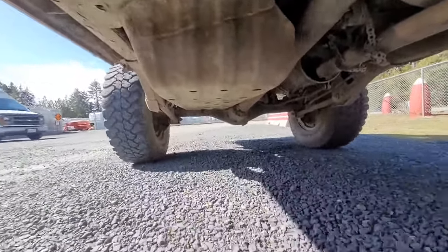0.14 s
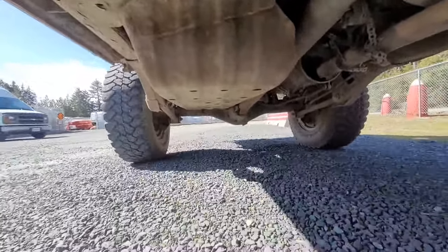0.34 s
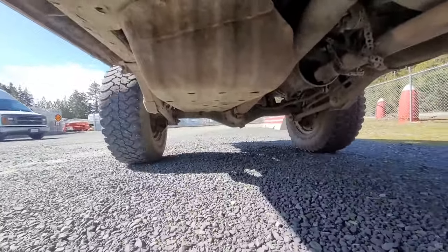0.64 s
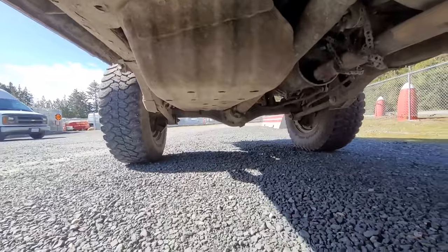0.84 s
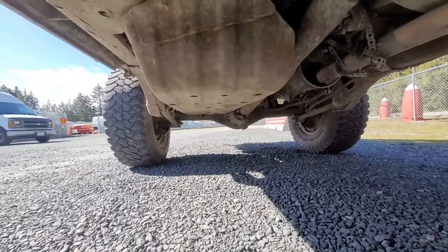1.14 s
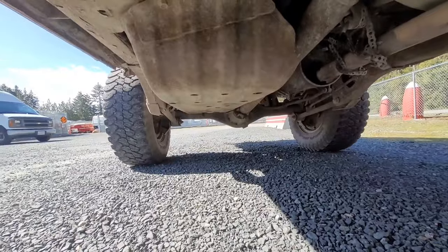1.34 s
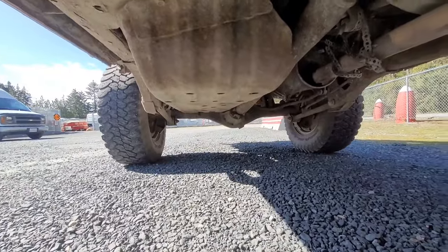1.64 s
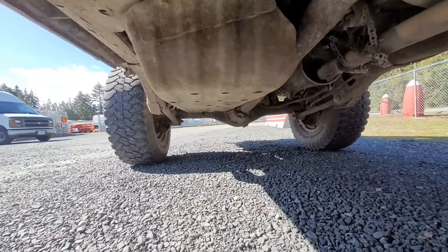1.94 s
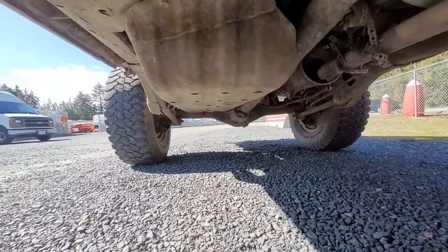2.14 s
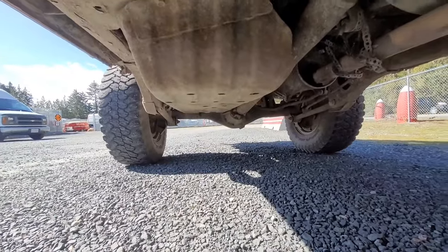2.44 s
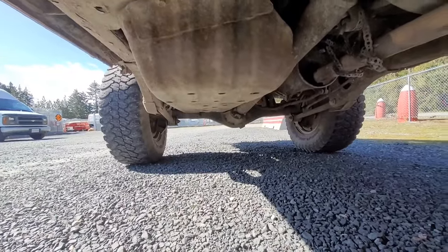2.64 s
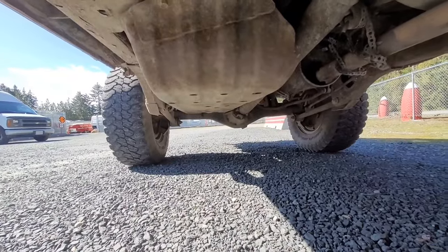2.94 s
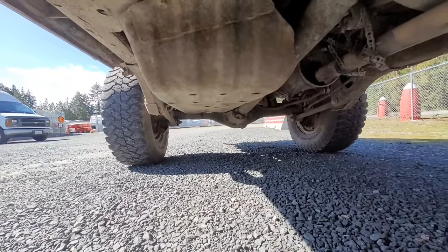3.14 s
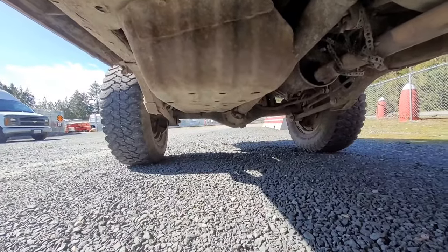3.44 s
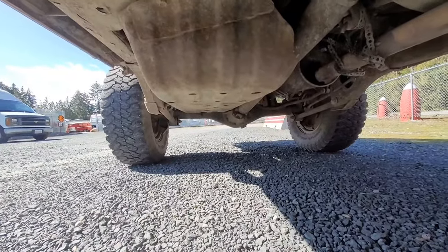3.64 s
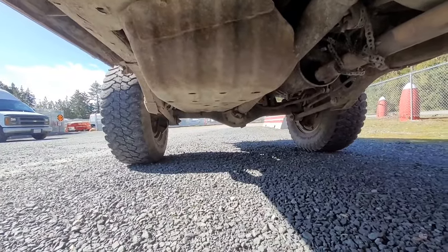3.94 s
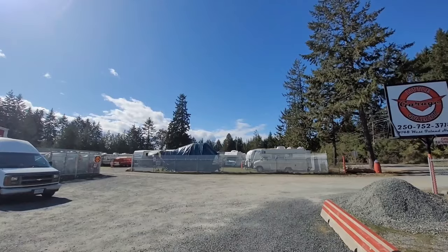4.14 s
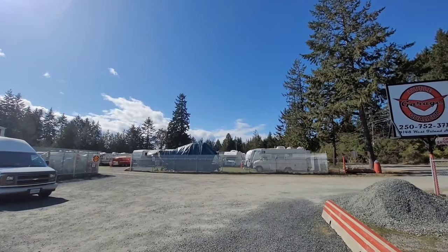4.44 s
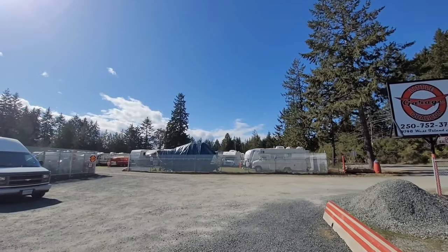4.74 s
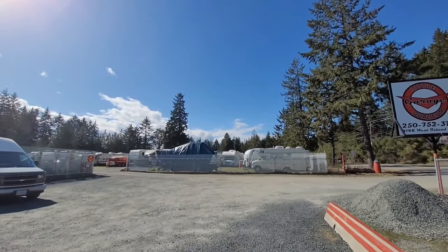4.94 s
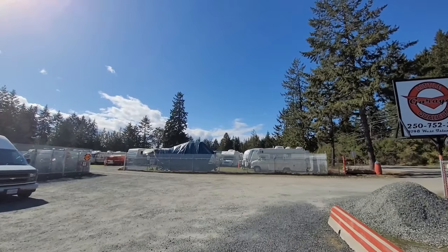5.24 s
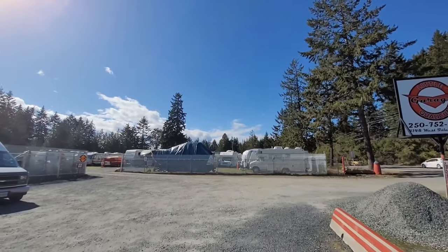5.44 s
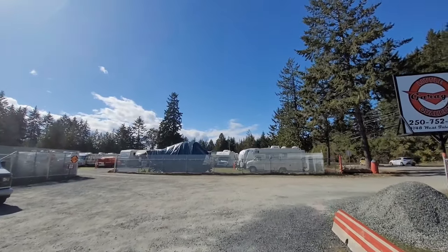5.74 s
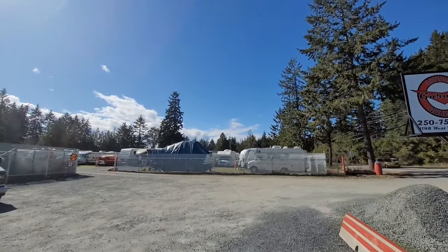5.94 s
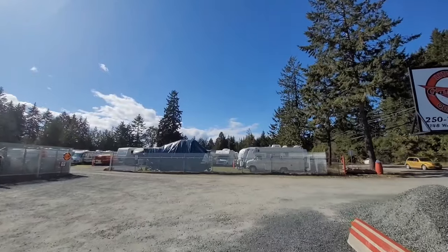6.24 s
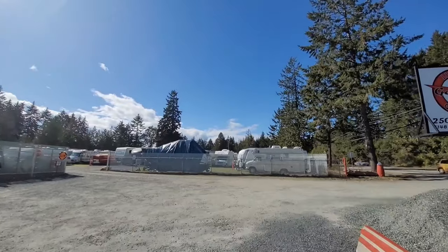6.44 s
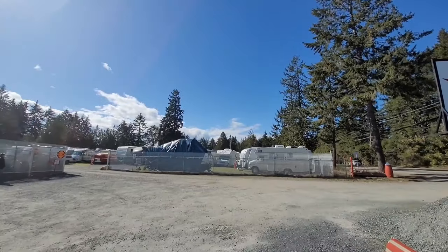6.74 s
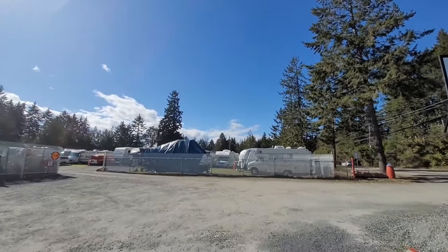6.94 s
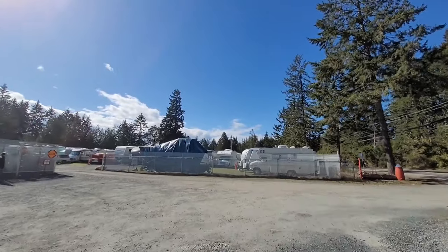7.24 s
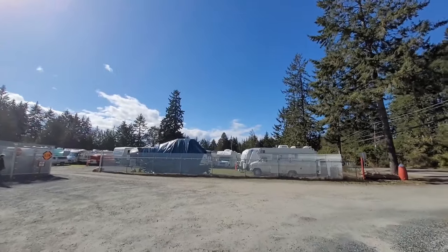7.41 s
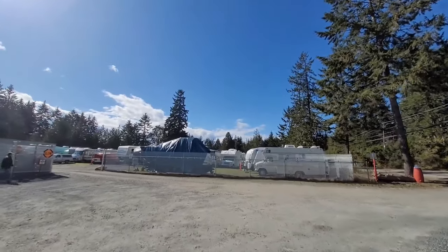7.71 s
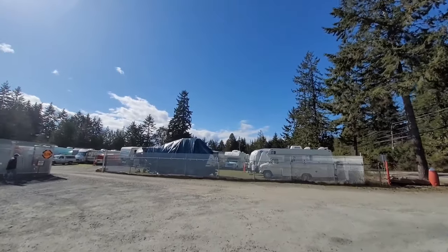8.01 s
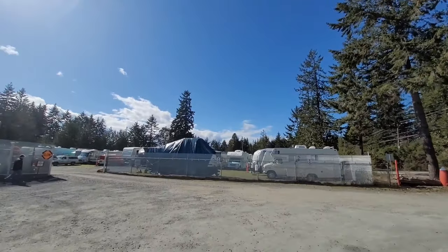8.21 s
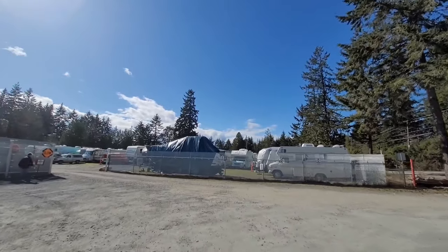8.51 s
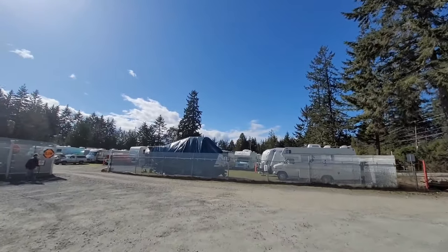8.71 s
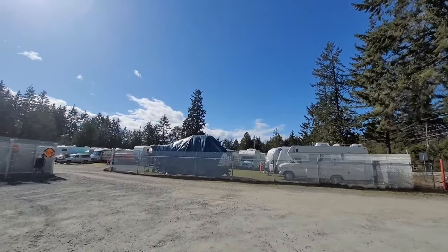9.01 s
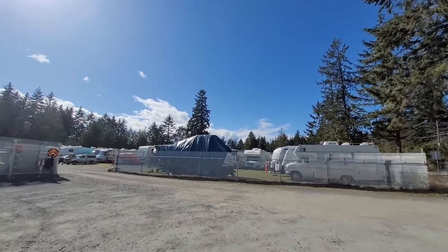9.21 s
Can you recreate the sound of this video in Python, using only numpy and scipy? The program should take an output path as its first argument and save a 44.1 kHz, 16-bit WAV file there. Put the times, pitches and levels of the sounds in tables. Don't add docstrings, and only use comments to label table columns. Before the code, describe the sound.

Two microphones close beneath a vehicle in an open gravel yard catch low exhaust throb, tyre roar and stony hiss. Metal clatters early, then chuffs slow to a near stop. A restrained pulling engine follows, with a scraping stone and gravel spray. After a tiny silent join, higher revs sink gradually while stones hit the pan, sand hisses and a car whooshes by; a slow idle remains.

```python
import sys
import numpy as np
from scipy import signal
from scipy.fft import rfft, irfft, next_fast_len
from scipy.io import wavfile
from scipy.ndimage import uniform_filter1d, map_coordinates

SR = 44100
rng = np.random.default_rng(int(sys.argv[2]) if len(sys.argv) > 2 else 0)


def store_wav(level_fs):
    pcm = np.round(np.clip(np.atleast_2d(level_fs), -1, 1) * 32767)
    wavfile.write(sys.argv[1], SR, pcm.T.astype(np.int16))


def how_loud(loudness_db):
    steps = np.asarray(loudness_db, float) / 20
    return 10 ** steps


N = 413199
T = np.arange(N) / SR

# time in seconds, firing rate in Hz, effort in dB.
ENGINE = [
    [(0, 29.8, -14.5), (.7, 30.0, -14.5), (1.0, 29.75, -16), (1.292, 29.5, -17.5), (1.42, 27.5, -19),
     (1.95, 27.84, -28)],
    [(1.97, 37.5, -25), (2.15, 38.27, -26.5), (2.45, 37.3, -27), (2.75, 36.78, -21.5), (3.42, 35.78, -23.5),
     (4.05, 33.98, -22.5)],
    [(4.08, 55.74, -21), (4.35, 58.6, -23), (4.5, 56.2, -24), (4.62, 53.8, -28), (5.22, 43.4, -28),
     (5.52, 38.42, -28), (6.01, 35.95, -24), (6.51, 35.7, -25.5), (7.3, 38.67, -27), (7.67, 37.73, -31.5),
     (7.75, 34.2, -23), (7.98, 30.5, -29), (8.38, 31.2, -29), (8.65, 29.0, -27), (8.9, 29.6, -26),
     (9.11, 27.9, -26), (9.37, 27.4, -25)],
]
CUTS_S = (1.96, 4.062)


def unit(x):
    return x / np.sqrt(np.mean(x ** 2) + 1e-20)


def along(points, hz):
    f, v = np.transpose(points)
    return np.interp(np.log(hz + 1), np.log(f + 1), v)


def curves(rows, t=T):
    s, *cols = np.transpose(rows)
    return [np.interp(t, s, c) for c in cols]


def held(rows, t=T):
    s, *cols = np.transpose(rows)
    return [c[np.searchsorted(s[1:], t)] for c in cols]


def by_stretch(rows):
    return np.transpose(rows)[:, np.searchsorted(CUTS_S, T)]


def waver():
    return 1.2 * map_coordinates(rng.standard_normal(60), [T * 5])


def resonate(x, modes):
    evenness = 0.53
    m = next_fast_len(N + SR // 2)
    f = np.fft.rfftfreq(m, 1 / SR)
    h = 0
    for centre, width, db in modes:
        near = (f * width) ** 2
        h = h + how_loud(db) * (near / ((centre * centre - f * f) ** 2 + near)) ** 1.375
    echoes = 2.4 * np.sin(2 * np.pi * f * .0072) * np.clip(f / 60 - 2.2, 0, 1)
    slip = -np.exp(-1j * (1.465 * np.log(f + 1) - 7.1 + echoes))
    y = irfft(rfft(x, m) * h * slip, m)[:N]
    y /= np.sqrt(np.mean(h ** 2))
    power = np.abs(uniform_filter1d(uniform_filter1d(y * y, size=4000), size=4000)) + 1e-12
    return y / power ** (evenness / 2)


def resonate_by_stretch(x, sets):
    which = np.searchsorted(CUTS_S[1 - len(sets):], T)
    return np.choose(which, [resonate(x, modes) for modes in sets])


def rush(spectrum, patchy_db, grit_db):
    grains = how_loud(grit_db * unit(uniform_filter1d(rng.standard_normal(N), size=90)))
    hz, t, z = signal.stft(grains * rng.standard_normal((3, N)), SR, nperseg=512)
    patches = uniform_filter1d(rng.standard_normal(z.shape[1:]), size=9, axis=0)
    patches = uniform_filter1d(patches, size=9, axis=1)
    z *= how_loud(patchy_db * unit(patches) + along(spectrum, hz)[:, None])
    return unit(signal.istft(z, nperseg=512)[1][:, :N])


def spread(x, share, loose=None):
    # start in seconds, samples left is late below the split,
    # samples left is late above it, share common to both microphones (0-1).
    lateness = [(0, 7, 7.5, .2), (.45, 6.5, 7.5, .36), (1.25, 7, 8, .55), (1.96, 15.5, 19, .3),
                (2.55, 17.5, 19.5, .45), (2.85, 19, 20, .55), (3.3, 20, 21, .75), (3.92, 18, 18.5, .75),
                (4.06, 21.5, 21.5, .6), (4.6, 22.5, 22, .6), (4.95, 13.5, 20, .5), (5.5, 14, 14, .55),
                (5.95, 16, 16.5, .7), (6.4, 18, 18, .6), (6.6, 21.5, 19.5, .75), (6.9, 23, 21.5, .9),
                (7.4, 22, 22, .75), (7.75, 18, 22, .6), (8.1, 13.5, 21, .6), (8.85, 13, 13, .65)]
    # pitch in Hz, factor on the common share.
    alikeness = [(250, 1.05), (1000, .9), (2500, .85), (4500, .95), (8000, .85), (14000, .7)]
    split_hz = 3600
    hz, t, z = signal.stft(x, SR, nperseg=512)
    under, over, common = uniform_filter1d(held(lateness, t), size=40)
    lag = np.where(hz[:, None] < split_hz, under, over)
    ramp = np.exp(1j * np.pi * share * hz[:, None] * lag / SR)
    pair = np.array([z / ramp, z * ramp])
    if loose is not None:
        alike = np.clip(along(alikeness, hz)[:, None] * common, 0, .97)
        own = signal.stft(loose, nperseg=512)[2]
        pair = np.sqrt(alike) * pair + np.sqrt(1 - alike) * own
    return signal.istft(pair, nperseg=512)[1][:, :N]


def underbody(x):
    t = np.arange(SR // 6) / SR
    tail = rng.standard_normal((2, len(t))) * how_loud(-60 * t / .07) * (t > .002)
    return signal.fftconvolve(x[None], tail / np.linalg.norm(tail[0]), axes=1)[:, :N]


def buffeting():
    # pitch in Hz, strength in dB per Hz.
    air = [(18, -36), (36, -6), (55, 11.5), (90, -16.5), (200, -25), (500, -62), (1500, -120)]
    return how_loud(-46) * rush(air, 2.5, 1.5)[:2]


def passing_car():
    # pitch in Hz, width in Hz, level in dB.
    far_modes = [(1500, 420, -1.5)]
    near_modes = [(1840, 580, -5), (3980, 420, -31)]
    nearest_s, comes_s, goes_s, level_db = 7.13, 0.15, 0.28, -36.5
    age = T - nearest_s
    swell = 1 / (1 + (age / np.where(age < 0, comes_s, goes_s)) ** 2) ** 0.95
    far = resonate(rng.standard_normal(N), far_modes)
    near = resonate(rng.standard_normal(N), near_modes)
    share = 1 / (1 + np.exp(-(age + 0.051) / 0.06))
    return how_loud(level_db) * swell * (np.sqrt(1 - share) * far + np.sqrt(share) * near)


def sand_scuff():
    # time in seconds, level in dB.
    swell = [(5.4, -68), (5.75, -50), (6.25, -46.5), (6.6, -52), (6.9, -68)]
    # pitch in Hz, width in Hz, level in dB.
    modes = [(2900, 800, 2), (5200, 700, -13)]
    level_db = curves([(5.3, -120)] + swell + [(7, -120)])[0]
    return how_loud(level_db) * resonate(rng.standard_normal(N), modes)


def stone_drag():
    # time in seconds, level in dB.
    scrape = [(2.95, -62), (3.12, -38), (3.27, -35), (3.45, -34), (3.65, -43.5), (4.05, -51)]
    # pitch in Hz, width in Hz, level in dB.
    modes = [(760, 270, 10.5), (1080, 200, -10)]
    lumps_db = 3.5 * map_coordinates(rng.standard_normal(400), [T * 35])
    level_db = curves([(2.9, -92)] + scrape + [(4.06, -89)])[0]
    return how_loud(level_db + lumps_db) * resonate(rng.standard_normal(N), modes)


def tyres():
    # time in seconds, rolling in dB, crunching stones in dB.
    rolling = [
        [(0, -33, -39.5), (1, -36.5, -42.5), (1.22, -36, -39.5), (1.41, -39, -41.5), (1.54, -42, -52),
         (1.95, -49.5, -59)],
        [(1.97, -46, -61), (2.3, -45.5, -58.5), (2.95, -38, -47.5), (3.06, -39.5, -41.5), (3.3, -36, -45),
         (3.33, -42, -48.5), (3.385, -40.5, -50), (3.41, -35.5, -43), (3.72, -43, -41.5), (3.8, -41, -44.5),
         (4.05, -41.5, -49.5)],
        [(4.08, -35.5, -53.5), (4.8, -36.5, -62.5), (5.6, -35.5, -64), (5.9, -33.5, -60), (6.32, -31, -50),
         (6.5, -33, -54), (6.8, -29.5, -48.5), (7.14, -31.5, -49), (7.6, -32, -53), (8.1, -31.5, -54.5),
         (8.5, -32.5, -54.5), (8.9, -30.5, -58.5), (9.37, -33, -55.5)],
    ]
    # rumble in dB over rolling, roar in dB over rolling, hiss shift in dB,
    # swish in dB over rolling.
    tread = [
        (4, -3.5, -0.7, -31.5),
        (1.5, -6, -1.5, -24),
        (0, -5, -2, -29.5),
    ]
    # pitch in Hz, strength in dB per Hz.
    rumble = [(150, -36), (250, 9), (356, 1.5), (399, 3.5), (792, 1), (908, 0.5), (1080, -6.5), (1400, -9),
              (1820, -42.5), (3080, -120)]
    roar = [(600, -47), (900, -7.5), (1200, -1.5), (1500, -2), (1850, -4), (2200, -7.5), (2700, -12),
            (3300, -23), (4000, -19.5), (6000, -59.5), (9000, -120)]
    crunch = [(1650, -26), (2800, -5), (3520, -8), (4660, -9.5), (5130, -13.5), (5600, -12.5), (6090, -16),
              (7230, -17.5), (8000, -18), (10400, -22.5), (17600, -120)]
    hiss = [(3820, -32.5), (6500, -17), (7220, -11.5), (7980, 3), (9130, -2), (12100, 6), (15300, -3),
            (15850, -4)]
    swish = [(2900, -30.5), (3500, -5.5), (4000, -6), (4600, -1), (5200, -10.5), (5900, -9), (6800, -33)]
    # time in seconds, tick in dB (not used), share of noise cut once a firing (0-1).
    chopping = [(0, -70, .2), (1.2, -70, .22), (1.3, -70, .1), (4.05, -70, .1), (4.1, -70, .2)]
    rolling_db, crunch_db = curves(np.vstack(rolling))
    rumble_db, roar_db, hiss_db, swish_db = by_stretch(tread)
    rumble_db = rumble_db + rolling_db
    roar_db = roar_db + rolling_db
    hiss_db = hiss_db - 47.5 + 1.22 * (crunch_db + 40.5)
    turns = np.cumsum(curves(np.vstack(ENGINE))[0]) / SR
    chop = 1 + np.clip(curves(chopping)[1], 0, 1) * np.cos(2 * np.pi * (turns + 0.18))
    surge_db = map_coordinates(rng.standard_normal(200), [T * 14])
    low = how_loud(rumble_db - 1.0) * rush(rumble, 0.95, 0.75)
    low += how_loud(roar_db + 0.38 * surge_db) * rush(roar, 0.48, 0.23)
    high = how_loud(crunch_db) * rush(crunch, 2.1, 0.81)
    high += how_loud(hiss_db) * rush(hiss, 0.58, 2.0)
    high += how_loud(swish_db + rolling_db + 1.5 * waver()) * rush(swish, 1.2, 1.2)
    return chop * (low + how_loud(.8 * surge_db) * high)


def chuffs():
    start_s, start_hz, slows_hz_per_s = 1.2845, 28.54, 34.9
    speed = np.sqrt(start_hz ** 2 - 2 * slows_hz_per_s * np.arange(12))
    return start_s + (start_hz - speed) / slows_hz_per_s, np.log10(speed / start_hz)


def puff(s, length):
    out, age = np.zeros(N + SR), np.arange(SR // 5) / SR
    shape = (1 - np.exp(-age / 0.0011)) * np.exp(-age / 0.052)
    out[round(s * SR):][:len(age)] = shape / (1 + np.exp((age - length) / 0.0066))
    return out[:N]


def puffs():
    # start in seconds, peak in dB, middle colour in dB, length in seconds.
    sprays = [
        (1.207, -37.5, 0, 0.056),
        (1.96, -55, 1, 0.028),
        (3.695, -39, -22, 0.061),
        (3.966, -45, -14, 0.091),
        (7.708, -67, 5, 0.021),
        (8.293, -63, 9, 0.035),
        (9.064, -64, -10, 0.11),
        (9.215, -52, -16, 0.073),
    ]
    # pitch in Hz, strength in dB per Hz.
    top_colour = [(2940, -48), (5000, -5), (5560, -8), (7290, -10), (9780, -11), (12100, -11.5),
                  (15800, -14.5)]
    mid_colour = [(350, -17), (600, -14), (1080, 3), (1900, 2), (2450, 7), (4640, 3.5), (7000, -64),
                  (9100, -49), (15400, -120)]
    stone_colour = [(450, -1), (900, 8), (1600, -7), (2200, -2.5), (2700, -1), (3800, -2), (4800, -18),
                    (9500, -23), (12500, -9), (15500, -17)]
    dust_colour = [(4700, -30), (5150, -2), (5350, -3), (5600, -8), (6100, -30)]
    chuff_db, top_fades_db, mid_fades_db, chuff_length_s = -30.5, 31.5, 22, 0.029
    bursts = [(s, chuff_db + top_fades_db * d, (mid_fades_db - top_fades_db) * d, chuff_length_s)
              for s, d in zip(*chuffs())]
    top, mid = np.zeros(N), np.zeros(N)
    for s, db, mid_db, length in bursts + sprays:
        top += how_loud(db + 0.5) * puff(s, length)
        mid += how_loud(db + mid_db + 2.5) * puff(s, length)
    out = top * rush(top_colour, 1.5, 1.2) + mid * rush(mid_colour, 2.2, 3.5)
    out += how_loud(-27) * puff(3.209, 0.051) * rush(stone_colour, 1.5, 2)
    dust = rush([(3000, -120)] + dust_colour + [(9000, -120)], 1, 1)
    return out + how_loud(-41.5) * puff(3.962, .095) * dust


def knocks():
    # start in seconds, peak in dB, ring in Hz, low ring in dB.
    blows = [(1.749, -13, 75, -25), (1.861, -19, 64.5, -29), (3.025, -47, 606, -2), (3.211, -22, 760, -18),
             (3.39, -17, 58, -29), (3.395, -28, 560, 10), (4.836, -24, 404, -14), (5.01, -28, 305, -19),
             (5.161, -27, 540, -3), (5.212, -29, 480, -15), (5.604, -29, 343, -19), (5.852, -20.5, 600, 3),
             (5.854, -22.5, 365, -14), (6.173, -26, 482, -15), (7.406, -35, 339, -15),
             (8.508, -39, 385, -15), (5.943, -18.5, 595, -20), (6.194, -18.5, 590, -8),
             (6.354, -8.5, 570, -13), (6.409, -1, 630, -18), (6.416, -4, 440, -9), (6.426, -8.5, 493, -18),
             (6.437, -13, 580, -17), (6.424, -15, 390, -25), (6.455, -14, 566, -22),
             (6.4912, -8, 490, -6.5), (6.522, -17, 566, -23), (6.933, -15, 843, -12),
             (6.934, -20, 540, -15), (8.5562, -22, 740, -7), (8.5598, -11, 492, 2.5), (8.573, -16, 700, -8),
             (8.703, -23, 647, -2)]
    # start in seconds, peak in dB, ring in Hz, rise in ms,
    # time to fall 60 dB in seconds.
    rattles = [(0.024, -24, 825, 0.56, .02), (0.044, -18, 770, 1.7, 0.042), (0.066, -10.5, 905, .4, 0.014),
               (0.0917, -1, 750, 1.5, 0.033), (0.153, -30, 786, 1, .03), (0.2045, -3, 773, 5, .035),
               (0.221, -10.5, 895, 3.7, .035), (0.326, -15, 780, .4, 0.014), (0.338, -17, 800, .4, 0.032),
               (0.3665, -14, 770, 2.2, 0.034), (0.3715, -12, 776, 0.9, .025), (0.0965, -10, 754, 1, .03),
               (0.209, -15, 790, 1, .025), (0.395, -15, 1040, 1, 0.033), (0.429, -20, 1000, .3, 0.011),
               (0.537, -7.5, 910, 0.72, 0.014), (0.569, -22, 700, 0.54, .02), (0.587, -21, 842, .5, 0.022),
               (0.607, -16, 760, 0.54, .025), (0.704, -21, 1040, .4, .015), (0.731, -21, 740, 1, 0.033),
               (0.741, -18, 1386, .4, 0.018), (0.966, -24, 830, .5, .02), (1.017, -23, 910, .4, .015)]
    # start in seconds, peak in dB, ring in Hz.
    bolt_ticks = [(0.0443, -20, 2030), (0.0666, -17.5, 2080), (0.0915, -19, 3000), (0.1261, -35, 2800),
                  (0.205, -22, 1980), (0.2264, -26, 2230), (0.338, -29, 2900), (0.352, -29, 2950),
                  (0.3614, -23, 3000), (0.4269, -39, 1550), (0.537, -33, 1950), (0.5874, -29, 1620),
                  (0.6754, -22, 2480), (0.7287, -31, 1500), (0.989, -35, 1670), (1.0296, -35, 2920),
                  (1.162, -29, 2040), (1.2067, -23, 2100)]
    pan_hz, blow_t60_s = 271, 0.046
    rows = []
    for s, db, hz, low_db in blows:
        notes = [(pan_hz, low_db), (hz, -1.5), (hz * 1.128, -9), (hz * 0.74, -9), (hz * 1.426, -13)]
        rows.append((s, db, notes, 0.87, blow_t60_s))
    for s, db, hz, rise_ms, t60 in rattles:
        notes = [(hz, 0), (hz * 1.104, -15), (hz * 1.6, -15), (2900, -11)]
        rows.append((s, db, notes, rise_ms, t60))
    for s, db, hz in bolt_ticks:
        rows.append((s, db, [(hz, 0), (hz * 1.38, -4), (hz * 0.75, -5)], .3, 0.031))
    for s, d in zip(*chuffs()):
        notes = [(467, 0), (pan_hz, 0), (1020, -9), (1430, -11)]
        rows.append((s + 0.00298, -21 + 13 * d, notes, .5, blow_t60_s))
    out, t = np.zeros(N + SR), np.arange(SR // 5) / SR
    for s, db, notes, rise_ms, t60 in rows:
        ring = sum(how_loud(level_db - 60 * t / t60 * max(hz / 900, 1)) * np.sin(2 * np.pi * hz * t)
                   for hz, level_db in notes)
        out[round(s * SR):][:len(t)] += how_loud(db) * ring * (1 - np.exp(-1000 * t / rise_ms))
    return out[:N]


def firings(hz, scatter_db, swing_db):
    count = np.floor(np.cumsum(hz) / SR).astype(int)
    size_db = scatter_db * rng.standard_normal(N // 100)[count] + swing_db * (-1) ** count
    return np.diff(count, prepend=0) * how_loud(size_db) * np.sqrt(SR / hz)


def valves(fired):
    # ring in Hz, width in Hz, level in dB.
    metal = [
        (2700, 900, -13),
        (4650, 330, 0),
        (3200, 500, -9),
        (5900, 1200, -11),
    ]
    early_s, fade_s, stops_s = .008, 0.00096, 1.2
    shut = np.roll(fired, -round(early_s * SR))
    shut = signal.lfilter([1], [1, -np.exp(-1 / (fade_s * SR))], shut) * rng.standard_normal(N)
    ring = sum(how_loud(db) * signal.lfilter(*signal.iirpeak(hz, hz / width, SR), shut)
               for hz, width, db in metal)
    return how_loud(-52) * unit(ring) * (T < stops_s)


def flywheel():
    # time in seconds, pitch in Hz, level in dB.
    moan = [
        (1.252, 60, -26),
        (1.422, 52.2, -16),
        (1.622, 37, -26),
        (1.75, 35.82, -31),
    ]
    hz, db = curves([(1.2, 62, -70)] + moan + [(1.8, 34.1, -69)])
    return how_loud(db + 2) * np.sin(2 * np.pi * np.cumsum(hz) / SR)


def motor_lines(hz, effort_db, idle_hz, idle_db):
    # multiple of the firing rate, level in dB against the effort.
    idle_orders = [(2, -20), (6, -9), (7, -1), (9, -13), (12, -17), (21, -28)]
    panel_orders = [(11, -20), (11.5, -18), (13.5, -24), (16.5, -27), (17, -29)]
    idle_turn = 2 * np.pi * np.cumsum(idle_hz) / SR
    lines = sum(how_loud(effort_db + idle_db + db + 0.6 * waver()) * np.sin(round(k) * idle_turn)
                for k, db in idle_orders)
    turn = 2 * np.pi * np.cumsum(hz) / SR
    early = np.clip((1.45 - T) / .2, 0, 1)
    return lines + early * sum(how_loud(effort_db + db + 1.8 * waver()) * np.sin(k * turn + waver())
                               for k, db in panel_orders)


def engines():
    # time in seconds, firing rate in Hz, strength in dB against the engine.
    idler = [
        (0, 24.6, -1),
        (.6, 23.5, -1),
        (1.25, 22.4, -2),
        (1.3, 22.3, -20),
        (1.9, 22.3, -20),
        (1.97, 22.3, -2),
        (4.05, 22, -6),
        (4.07, 22, -60),
    ]
    # start in seconds, size scatter in dB, strong-weak swing in dB,
    # noise share (0-1).
    unevenness = [
        (0, .8, 1.2, .035),
        (1.33, 2, 1, .3),
        (1.96, 1.5, .5, .09),
        (4.06, .6, .6, .015),
        (7.67, 1.5, .5, .1),
        (7.92, 1.2, 1.3, .07),
    ]
    # boom, pipe, silencer and growl, all in dB.
    places = [
        (-17.5, -4.5, -7.5, -6),
        (-10, -0.5, -6, -16),
        (-1.5, -0.5, -12, -16),
    ]
    # time in seconds, pipe in dB, silencer in dB.
    load = [(0, 1, -4), (.3, -1.5, -5), (.5, 1, -0.5), (.85, 0, -0.5), (1.9, -1.5, -1.5), (2.2, 1.5, -0.5),
            (2.38, -5.5, 1.5), (2.7, 2, -5.5), (2.9, -2, -0.5), (3.12, -4, 3.5), (3.25, 5.5, -4.5),
            (3.37, -7, -8), (3.55, 0, 0.5), (4.05, -3, 1), (4.1, 0, 3.5), (7.2, -0.5, 0.5), (7.6, -8, 10.5),
            (7.8, -0.5, -3), (8.8, 0, -3)]
    # pitch in Hz, width in Hz, level in dB.
    cavity = [
        [(30, 17, -24), (51.8, 7.9, -13), (68, 7.8, -13)],
        [(37, 8, 10.5), (48.7, 10, 27), (62, 12, 9.5), (78, 11.7, 10)],
    ]
    pipe = [
        [(86.5, 25, -5.5), (115.5, 11.2, 2)],
        [(85.8, 2.4, -19.5), (113.1, 33.2, -13)],
    ]
    silencer = [
        [(151.3, 6.9, 7.5), (156.7, 51, 13.5), (191, 14, 0.5)],
        [(141.8, 8.6, 6.5), (160, 6.7, 11), (174.4, 32, 4.5)],
        [(148.3, 6.8, 9.5), (160, 7, -14)],
    ]
    panels = [
        [(225.4, 19.5, 4.5), (293, 51, 1.5), (339.5, 29, 6), (393, 47, -2.5), (484, 104, -12)],
        [(219, 63, -1.5), (296, 24, -1), (365, 48, -4.5), (442, 15, -7.5)],
        [(194, 50, 15.5), (256, 64, 7), (305, 34, 5.5), (356, 63, 0), (450, 220, -26)],
    ]
    # time in seconds, level in dB.
    last_kick = (1.86, -15)

    hz, effort_db = curves(np.vstack(ENGINE))
    boom_db, pipe_db, throat_db, growl_db = effort_db + by_stretch(places) + [waver() for _ in range(4)]
    pipe_load_db, throat_load_db = curves(load)
    pipe_db = pipe_db + pipe_load_db + 2.5 * np.log2(np.maximum(hz / 40, 1))
    throat_db = throat_db + throat_load_db
    growl_db = growl_db + 17.5 * np.log2(hz / 36)
    idle_hz, idle_db = curves(idler)
    scatter_db, swing_db, share = held(unevenness)

    own = firings(hz, scatter_db, swing_db)
    idle_late_s, thump_late_s = .0042, 0.00886
    drive = own + how_loud(idle_db) * np.roll(firings(idle_hz, .8, .3), round(idle_late_s * SR))
    times, decades = chuffs()
    thump_at = np.round((times + thump_late_s) * SR).astype(int)
    drive[thump_at] += how_loud(-12.5 + 45.0 - 18 * decades)
    drive[round(last_kick[0] * SR)] += how_loud(last_kick[1] + 51.5)

    def part(level_db, noise_share, sets):
        rough = np.sqrt(1 - noise_share) * drive + np.sqrt(noise_share) * rng.standard_normal(N)
        return how_loud(level_db) * resonate_by_stretch(rough, sets)

    throb = part(boom_db, share / 2, cavity) + part(pipe_db, share, pipe)
    throb += part(throat_db, share, silencer)
    throb += part(growl_db, np.clip(3 * share + .13, 0, .8), panels)
    tones = flywheel() + motor_lines(hz, effort_db, idle_hz, idle_db)
    return throb + tones, valves(own)


def scene():
    noise = tyres() + puffs()
    blows = knocks()
    motor, ticks = engines()
    motor_highs = signal.lfilter(*signal.butter(3, 230, 'high', fs=SR), motor)
    motor_bass = signal.lfilter(*signal.butter(2, 70, fs=SR), motor)
    near = spread(motor + ticks, .8) + spread(blows, .9)
    near += how_loud(-5.5) * underbody(blows) + how_loud(-7) * underbody(motor_highs)
    near += np.array([[-1], [1]]) * 0.23 * motor_bass
    side = noise[0] + passing_car() + stone_drag() + sand_scuff()
    mix = how_loud([[-.08], [.08]]) * near + how_loud([[-2], [2]]) * buffeting()
    return mix + spread(side, 0.97, noise[1:])


def top_cut(x):
    return signal.sosfilt(signal.butter(12, 15850, fs=SR, output="sos"), x)


def record(dry):
    # sound out, fade-out, sound back and fade-in, all in seconds.
    join = (4.0578, .0015, 4.062, .012)
    out, fade_out, back, fade_in = join
    gap = np.clip(np.maximum((out - T) / fade_out, (T - back) / fade_in), 0, 1)
    gap *= np.clip((T[-1] - T) / .003, 0, 1)
    passed = np.fft.rfftfreq(2 * N, 1 / SR) < 15850
    band = irfft(rfft(dry * gap, 2 * N) * passed)[:, :N]
    return top_cut(band)


dry = scene()
out = record(dry)
store_wav(out)
```